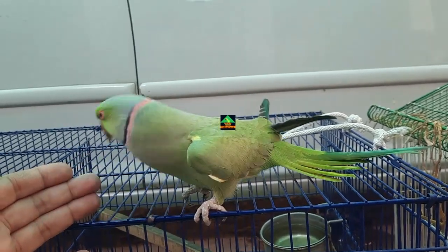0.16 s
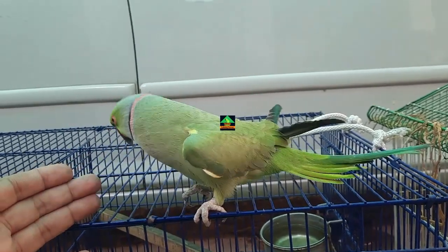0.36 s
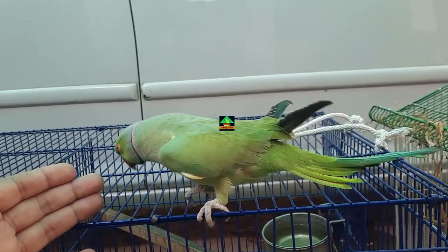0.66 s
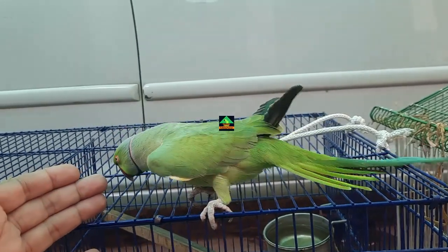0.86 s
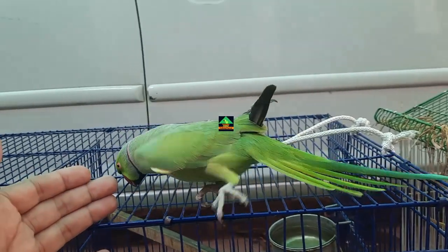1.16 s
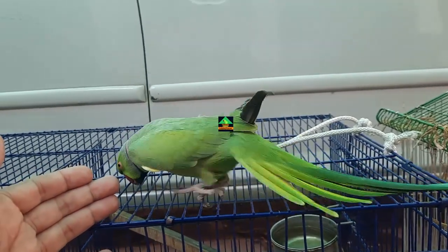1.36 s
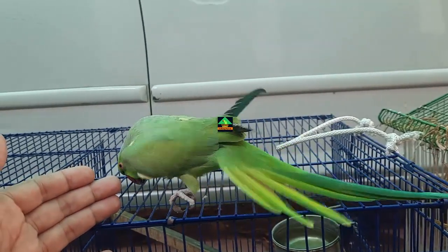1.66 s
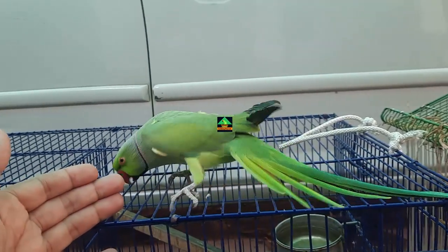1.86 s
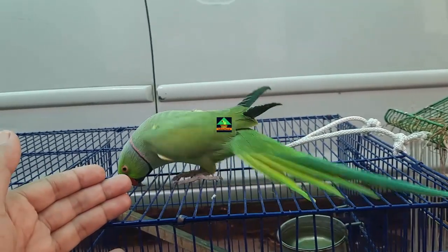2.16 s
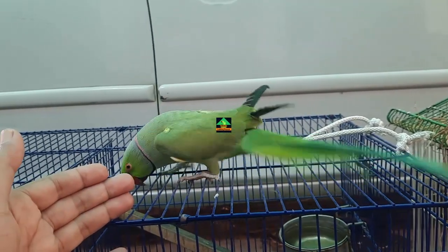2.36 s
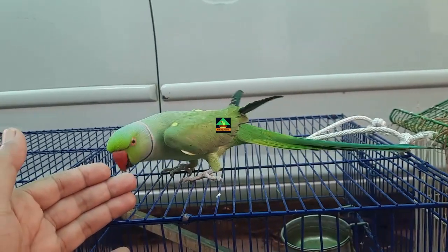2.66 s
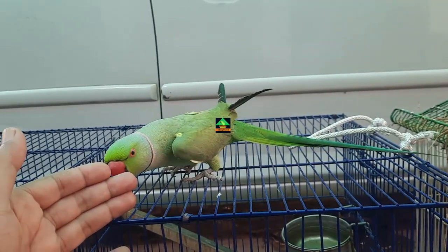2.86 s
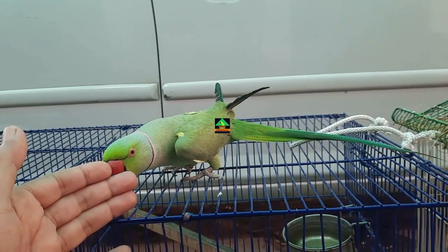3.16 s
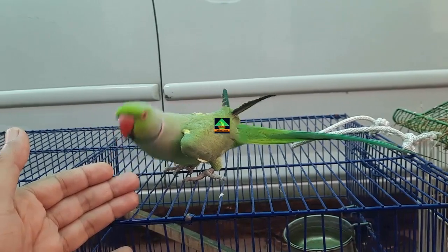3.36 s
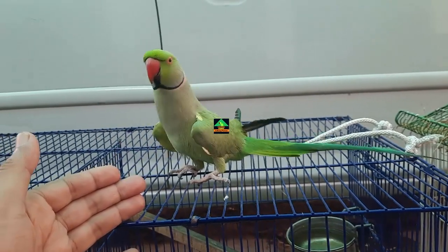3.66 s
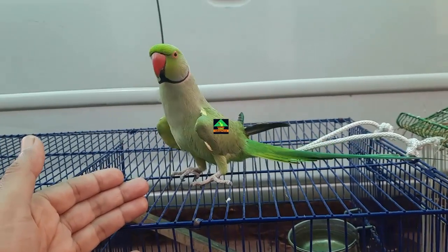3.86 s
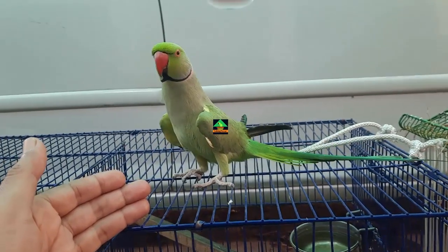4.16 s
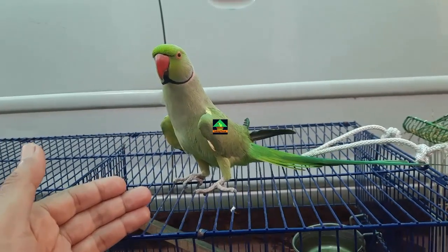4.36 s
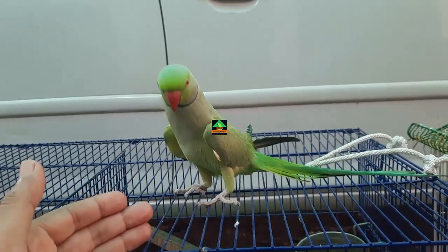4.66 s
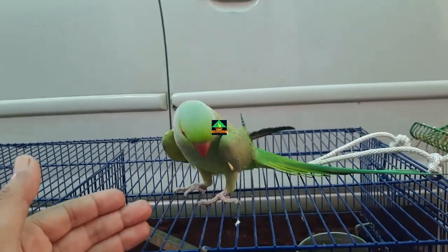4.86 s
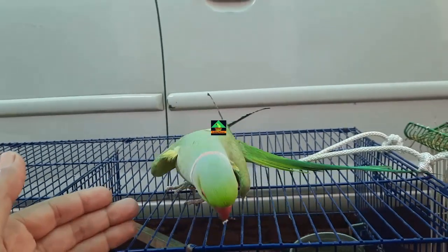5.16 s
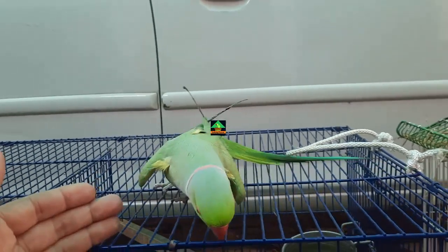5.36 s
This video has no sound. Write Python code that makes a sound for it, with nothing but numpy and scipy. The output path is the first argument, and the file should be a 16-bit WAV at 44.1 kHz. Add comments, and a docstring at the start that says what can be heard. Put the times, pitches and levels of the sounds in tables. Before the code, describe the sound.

Close stereo sound indoors: a bird's descending squawk comes first, followed by sparse metallic claw ticks and light feather brushing over low hum. A brief piercing whistle holds, then sags. More small ticks lead into six regularly spaced, arched parrot screeches, rough and bright, slightly weaker towards the end. The bird sits left of centre, with short reflections from the hard room.

```python
"""Parakeet on a wire cage

A parakeet close to two microphones in a bare room gives a falling squawk, a whistle and six arched screeches.
Its voice is a harmonic series with breath noise, filtered by throat resonances; air puffs precede calls.
Claws tick by exciting damped wire modes, and feathers rustle as short strokes of grainy noise.
Dense echoes and feedback delays form the space; noise bands and a narrow drone give hum and hiss."""
import sys
import numpy as np
from scipy import signal
from scipy.fft import rfft, irfft, next_fast_len
from scipy.io import wavfile

SR = 44100
rng = np.random.default_rng(int(sys.argv[2]) if len(sys.argv) > 2 else 0)


def unload_wav(signal):
    """Save mono or channel-first audio to the path in sys.argv[1] as 16-bit WAV at rate SR, clipped to [-1, 1]."""
    wavfile.write(
        sys.argv[1],
        SR,
        np.round(np.clip(np.atleast_2d(signal).T, -1, 1) * 32767).astype(np.int16),
    )


def voltage_ratio(decibels):
    """Convert decibels (scalar or array-like) to amplitude ratios, 20 dB per decade."""
    exponent = np.asarray(decibels, float) / 20
    return 10 ** exponent


N = 242550
TIME = np.arange(N) / SR

# falling squawk, already under way at the start: time_s, pitch_hz, level_db
SQUAWK_PATH = [(-0.02, 1670, -16.5), (0.033, 1752, -19.5), (0.043, 1427, -17.5), (0.09, 1398, -23.5),
               (0.22, 1284, -26), (0.25, 1134, -30.5), (0.345, 1036, -30), (0.41, 716, -40),
               (0.445, 674, -33.5)]
# whistle that holds, tips up and sags: time_s, pitch_hz, level_db
WHISTLE_PATH = [(1.862, 2120, -25.5), (1.88, 1966, -15), (1.95, 1927, -12.5), (1.98, 1980, -16.5),
                (2.005, 2040, -16), (2.022, 1947, -16), (2.05, 1722, -21.5), (2.09, 1522, -19),
                (2.125, 1436, -37)]
# roughness (0-1) at a held call's top pitch, and what is added as the pitch sags to nothing
CLEAR_ROUGH, SAG_ROUGH = .08, .55
# arched screeches: start_s, top_s, end_s, leap_pitch_hz, top_pitch_hz
SCREECH_ARCHES = [(3.436, 3.515, 3.58, 1820, 2543), (3.706, 3.779, 3.852, 1821, 2650),
                  (3.989, 4.049, 4.145, 1950, 2780), (4.285, 4.341, 4.43, 2176, 2696),
                  (4.568, 4.618, 4.724, 2363, 2732), (4.878, 4.926, 5.022, 2482, 2710)]
# opening croak, its share of the way to the top, then a leap
CROAK_HZ, CROAK_SHARE, LEAP_S = 1337.5, .13, .005
END_HZ = 1530
# screech descent: falling_time_share (0-1), pitch_drop_share (0-1)
PITCH_FALL = [(0.118, 0.107), (.38, .55), (.5, .64), (0.849, .83)]
# screech strength, before tiring, and roughness: pitch_hz, level_db, roughness (0-1)
SCREECH_VOICE = [(1410, -12.5, 0.41), (1430, -20.5, 0.41), (1746, -12, 0.22), (1950, -9, 0.28),
                 (2307, -13.5, 0.45), (2560, -15.5, .44), (2780, -21, 0.39)]
TIRING_DB_PER_S = -1.5   # later screeches are weaker
# membrane spectrum before the throat: pitch_multiple, relative_level_db
MEMBRANE_OVERTONES = [(.5, 1.5), (1, -10), (2, 4), (3, -7), (5, -8), (8, -21), (24, -48.5)]
# windpipe and beak resonances: centre_hz, width_hz (between points 6 dB down), gain_db
THROAT_RESONANCES = [(694, 580, 5.5), (1410, 900, -3.5), (2475, 1200, 1), (3724, 1540, 0), (4690, 220, 3),
                     (6855, 1780, -1.5), (11230, 2100, -8.5), (14100, 1600, -11.5)]
# half-pitch lines, further weighted by roughness squared: one gain_db each for squawk, whistle, screeches
HALF_PITCH_GAINS = [-38, -5.5, -10]
BEAK_HISS_DB = -4.5   # at full roughness, relative to the tone
# head direction for squawk, whistle, screeches: left_louder_db, left_earlier_ms,
# right_echo_db (relative to the direct sound), brightness_db_per_octave, octave_line_boost_db
HEAD_DIRECTIONS = [(3, -0.125, -47, -5, -4), (3, -0.41, -20, -0.5, -4), (7, 0.4356, -1, 1, 0)]
ECHO_MS = 0.3997
# short hiss as the beak opens before a call: start_s, relative_level_db
BEAK_PUFFS = [(1.848, -19), (3.4177, -24), (3.689, -18.5), (3.975, -19), (4.266, -21.5), (4.553, -24),
              (4.859, -27.5)]
# claws and beak on the wires: time_s, strength_db, left_louder_db (ringing only), low_modes_db
WIRE_TOUCHES = [(0.6849, -14, 3, -21.5), (1.1753, -15, 4, -20), (1.4352, -25, -16, -22.5),
                (2.7579, -31, 4, -28), (3.0588, -21, 27, -40), (3.064, -18, -10, -48),
                (3.068, -32, -12.5, -35), (3.159, -40.5, 7.5, 8.5), (3.174, -52, 22, 10),
                (4.487, -32, -15, -4), (5.147, -22, 17, -35), (5.163, -25.5, 28, -37.5),
                (5.177, -12.5, -0.5, -68)]
# resonant modes of the wires: frequency_hz, relative_level_db, t60_s
WIRE_MODES = [(1000, -2, .015), (1700, -4, .012), (3100, -7, .008), (3900, -9, .008), (6300, -3, .009),
              (7400, -2, .008), (11000, -6, .006), (13500, -7, .005)]
# feathers and feet brushing: start_s, length_s, noise_level_db, centre_hz
BRUSH_STROKES = [(0.312, 0.055, -51.5, 12030), (0.778, 0.1, -56.5, 12000), (1.022, 0.059, -48.5, 11000),
                 (1.082, 0.062, -54.5, 8000), (1.153, 0.08, -55.5, 8000), (1.414, 0.088, -52.5, 9120),
                 (1.563, 0.11, -58.5, 12000), (2.316, 0.096, -60.5, 9600), (2.417, 0.067, -60.5, 10820),
                 (2.987, 0.061, -53, 12100), (3.055, 0.027, -28.5, 7350), (3.364, 0.048, -57, 9000),
                 (4.462, 0.076, -46.5, 10040), (5.15, 0.028, -32, 6760), (5.40, 0.059, -60.5, 10030)]
ROOM_T60_S, ROOM_DB = 0.37, -23   # decay time without wall dulling; level of the feedback sound
WALL_CUT_HZ = 13000
# slow level curve of the background: time_s, gain_db
BACKGROUND_SWELL = [(0, 3), (.75, 0), (1.5, 3), (1.86, 1.5), (1.95, -0.5), (2.5, -4), (3.4, -0.5),
                    (3.6, -3), (5, -3.5), (5.5, -5.5)]
# hum spectrum: frequency_hz, relative_density_db_per_hz
HUM_SPECTRUM = [(12, -59), (20, -46), (31, -25.5), (65, -1.5), (101, -3), (129, 3.5), (176, -10),
                (206, -12.5), (241, -42), (286, -8), (307, -5), (414, -22.5), (600, -25.5), (780, -57),
                (1320, -120)]
# hiss spectrum: frequency_hz, relative_density_db_per_hz
HISS_SPECTRUM = [(260, -30), (450, -4), (794, -8.5), (1020, -9.5), (2330, -13), (5060, -25), (7690, -24.5),
                 (9200, -40.5), (13000, -20.5), (16000, -94.5)]
# stereo coherence of the background: frequency_hz, left_right_correlation (-1 to 1)
STEREO_LIKENESS = [(60, 0.97), (180, 0.89), (550, 0.29), (1650, -0.18), (4970, -0.037), (15000, 0.47)]
HUM_DB, HISS_DB, DRONE_DB = -35, -49.5, -47   # before the swell and the left-right balance
HISS_FOLLOWS, DRONE_FOLLOWS = 1, 3.8   # dB for each dB of the swell


def rms_one(x):
    """Normalisation: equal mean power makes levels comparable, here rms 1."""
    return x / np.sqrt(np.mean(x ** 2) + 1e-20)


def at_hz(points, hz):
    """Spectral interpolation: values run straight between points on a log-frequency axis."""
    points_hz, values = np.transpose(points)
    return np.interp(np.log(hz), np.log(np.maximum(points_hz, 1)), values)


def wobble(rate_hz, size):
    """Low-passed noise: four cascaded one-pole filters leave random wandering of spread 1."""
    noise = rng.standard_normal(size + 8000)   # the first 8000 samples let the filter settle
    r = np.exp(-2 * np.pi * rate_hz / SR)
    return rms_one(signal.sosfilt([[1 - r, 0, 0, 1, -r, 0]] * 4, noise)[8000:])


def band(x, low_hz, high_hz):
    """Band-pass filtering: only the range between two cut-off frequencies passes freely."""
    edges_hz = [low_hz, min(high_hz, .45 * SR)]
    return signal.sosfilt(signal.butter(2, edges_hz, "band", fs=SR, output="sos"), x)


def late(x, ms):
    """Propagation delay: the same wave arrives later (earlier if ms is negative)."""
    return np.interp(TIME - ms / 1000, TIME, x)


def bird():
    """Binaural cues: level and arrival differences, with a close echo at the right microphone."""
    out = np.zeros((2, N))
    sway_ms = 0.026 * wobble(27.2, N)   # the head never keeps still
    kinds = [[sagging(SQUAWK_PATH)], [sagging(WHISTLE_PATH)], [screech(*row) for row in SCREECH_ARCHES]]
    for calls, direction, half_db in zip(kinds, HEAD_DIRECTIONS, HALF_PITCH_GAINS):
        left_db, early_ms, echo_db, tilt_db, octave_db = direction
        voice = sum(call(rows, tilt_db, octave_db, half_db) for rows in calls)
        delay_ms = early_ms + sway_ms
        echo = voltage_ratio(echo_db) * late(voice, delay_ms + ECHO_MS)
        out[0] += voice
        out[1] += voltage_ratio(-left_db) * (late(voice, delay_ms) + echo)
    return out


def sagging(rows):
    """Pitch-dependent roughness: a held call grows rougher as its pitch sags."""
    s, pitch_hz, level_db = np.transpose(rows)
    rough = CLEAR_ROUGH + SAG_ROUGH * (1 - pitch_hz / pitch_hz.max())
    return np.transpose([s, pitch_hz, level_db, rough])


def screech(start_s, top_s, end_s, leap_hz, top_hz):
    """Frequency modulation: croak, leap, rounded climb and fall also set strength and roughness."""
    s = np.arange(start_s, end_s, .002)
    croak_s = start_s + CROAK_SHARE * (top_s - start_s)
    leap = np.clip((s - croak_s) / LEAP_S, 0, 1)
    climb = np.clip((s - croak_s - LEAP_S) / (top_s - croak_s - LEAP_S), 0, 1)
    fall_points = [(0.017, 0.0008), *PITCH_FALL, (0.98, 1)]
    drop = np.interp((s - top_s) / (end_s - top_s), *np.transpose(fall_points))
    hz = CROAK_HZ + (leap_hz - CROAK_HZ) * leap
    hz = hz + (top_hz - leap_hz) * np.sin(np.pi / 2 * climb) - (top_hz - END_HZ) * drop
    voice_hz, voice_db, voice_rough = np.transpose(SCREECH_VOICE)
    tiring_db = TIRING_DB_PER_S * (start_s - SCREECH_ARCHES[0][0])
    level_db = np.interp(hz, voice_hz, voice_db) + tiring_db
    return np.transpose([s, hz, level_db, np.interp(hz, voice_hz, voice_rough)])


def call(rows, tilt_db, octave_db, half_db):
    """Source-filter voice: a rough membrane tone joins breath and beak noise under one envelope."""
    s, pitch_hz, level_db, rough = np.transpose(rows)
    rise_s, fall_s = .0015, .006
    at = slice(max(int((s[0] - 3 * rise_s) * SR), 0), int((s[-1] + 6 * fall_s) * SR))
    t = TIME[at]
    hz = np.interp(t, s, pitch_hz)
    rough = np.clip(np.interp(t, s, rough), 0, 1)
    shake = (.004 + .04 * rough) * wobble(420, len(t))
    phase = 2 * np.pi * np.cumsum(hz * (1 + shake)) / SR
    # a call opens with a weaker croak whose overtones are nearly even
    settled = np.clip(.35 + (t - s[0] - .006) / .012, .35, 1)
    tone = membrane(hz, phase, rough, settled, tilt_db, octave_db, half_db)
    share = rough ** 3 * voltage_ratio(11)   # breath relative to the tone
    hiss = voltage_ratio(BEAK_HISS_DB) * rough * rms_one(band(rng.standard_normal(len(t)), 4800, 15000))
    mix = (tone + share * breath(phase, tilt_db) + hiss) / np.sqrt(1 + share ** 2)
    edges = np.exp(np.minimum(t - s[0], 0) / rise_s + np.minimum(s[-1] - t, 0) / fall_s)
    out = np.zeros(N)
    out[at] = mix * voltage_ratio(np.interp(t, s, level_db)) * edges * settled
    return out


def membrane(hz, phase, rough, settled, tilt_db, octave_db, half_db):
    """Harmonic series: overtones and half-pitch lines, each modulated alone, excite the throat."""
    tone, power = 0, 0
    for k in np.arange(.5, 24, .5):
        line_db = settled * at_hz(MEMBRANE_OVERTONES, k) if k >= 1 else settled * MEMBRANE_OVERTONES[0][1]
        if k >= 1:
            line_db = settled * at_hz(MEMBRANE_OVERTONES, k)
        source = voltage_ratio(line_db + tilt_db * np.log2(k) + octave_db * (k == 2))
        if k % 1:
            source = source * rough ** 2 * voltage_ratio(half_db)
        gain = source * throat(k * hz) * (k * hz < .4 * SR)
        # each line swells and breaks up by itself, the high ones most and fastest
        depth = (.04 + .9 * rough) * k ** .85
        beat = 1 + depth * wobble(min(200 + 110 * k, 1100), len(hz))
        tone = tone + gain * beat * np.sin(k * phase)
        power = power + gain ** 2 * (1 + depth ** 2) / 2
    return tone / np.sqrt(power)


def breath(phase, tilt_db):
    """Turbulence noise: throat-filtered air pulses with each cycle, above a lumpy low rasp."""
    size = len(phase)
    air = rng.standard_normal(size) * (1 + 0.23 * np.sin(phase))
    bins_hz = np.fft.rfftfreq(size, 1 / SR) + 1
    colour = throat(bins_hz) ** 1.16 * voltage_ratio(tilt_db * np.log2(bins_hz))
    air = rms_one(irfft(rfft(air) * colour, size))
    rasp = rms_one(band(rng.standard_normal(size), 400, 1980))
    return air + voltage_ratio(-14 + 7.5 * wobble(60.9, size)) * rasp


def throat(hz):
    """Resonance: the powers of the windpipe and beak formants add to give the gain."""
    power = sum(voltage_ratio(db) ** 2 / (1 + (2 * (hz - top) / width) ** 2) ** 2
                for top, width, db in THROAT_RESONANCES)
    return np.sqrt(power)


def puffs():
    """Transient turbulence: band-passed noise starts sharply and dies away along a Gaussian."""
    length_s, shape = .007, 0
    for s, db in BEAK_PUFFS:
        x = np.maximum(TIME - s, 0) / length_s
        shape = shape + voltage_ratio(db) * np.minimum(x * 6, 1) * np.exp(-x ** 2)
    air = shape * rms_one(band(rng.standard_normal(N), 1800, 11000)) / np.pi
    return np.array([air, voltage_ratio(-2) * late(air, 0.21)])


def ticks():
    """Modal impact: each touch cracks and sets damped wire modes ringing at random strengths."""
    s, peak_db, left_db, low_db = np.transpose(WIRE_TOUCHES)
    chance_db = rng.normal(0, 2.5, (len(s), len(WIRE_MODES)))
    out = np.zeros((2, N))
    for (hz, db, t60_s), own_db in zip(WIRE_MODES, chance_db.T):
        clicks = np.full((2, N), 1e-18)
        strength_db = peak_db + db + own_db + (low_db if hz < 2000 else -10)
        clicks[:, (s * SR).astype(int)] = voltage_ratio(strength_db + np.outer([.5, -.5], left_db))
        r, w = voltage_ratio(-60 / (t60_s * SR)), 2 * np.pi * hz / SR   # decay and phase step per sample
        out += signal.lfilter([0, np.sin(w)], [1, -2 * r * np.cos(w), r * r], clicks)
    hard_db = peak_db - np.maximum(low_db + 2.5, 0) / 2   # dull, low touches crack less
    crack, crack_s = 0, 0.0011
    for at, db in zip(s, hard_db):
        decay = np.exp(-np.maximum(TIME - at, 0) / crack_s) * (TIME >= at)
        crack = crack + voltage_ratio(db - 6) * decay
    return out + crack * band(rng.standard_normal((2, N)), 2850, 12000)


def rustles():
    """Friction noise: random grains form short band-limited strokes that start fast and fade."""
    out, octaves = np.zeros((2, N)), 0.76   # half-width of each band
    for s, length_s, db, hz in BRUSH_STROKES:
        at = slice(int(s * SR), int((s + 2 * length_s) * SR))
        x = (TIME[at] - s) / length_s
        grains = rng.standard_normal((2, len(x))) * voltage_ratio(4 * wobble(160, len(x)))
        brush = rms_one(band(grains, hz * 2 ** -octaves, hz * 2 ** octaves))
        out[:, at] += voltage_ratio(db) * np.minimum(8 * x, 1) * np.exp(-x ** 4) * brush
    return out * voltage_ratio([[1.5], [-1.5]])


def scatter(x):
    """Scattering: wires, hand and wall return dense bright echoes, different at each microphone."""
    t = TIME[:SR // 25]
    echoes = band(rng.standard_normal((2, len(t))), 2500, 8500) * np.exp(-t / 0.012) * (t > .001)
    echoes = echoes / np.sqrt(np.sum(echoes ** 2, axis=1, keepdims=True))
    return voltage_ratio(-11) * signal.fftconvolve(x, echoes, axes=1)[:, :N]


def room(x):
    """Reverberation: ten feedback delays a side lose level and treble on every round."""
    size = next_fast_len(N + SR)
    z = np.exp(-2j * np.pi * np.fft.rfftfreq(size))   # delay of one sample
    dull = np.exp(-2 * np.pi * WALL_CUT_HZ / SR)
    out = [0, 0]
    for k, lag in enumerate((rng.uniform(.008, .03, 20) * SR).astype(int)):
        loss = voltage_ratio(-60 * lag / SR / ROOM_T60_S)
        loop = loss * np.exp(lag * np.log(z)) * (1 - dull) / (1 - dull * z)
        out[k % 2] = out[k % 2] + loop / (1 - loop) * (-1) ** (k // 2)
    return irfft(rfft(x, size) * np.array(out), size)[:, :N]


def steady(spectrum, edges_hz, patchy_db):
    """Partial coherence: shared and opposed noise make flickering stereo bands, at overall rms 1."""
    out, white = 0, rng.standard_normal((2, 2, N + 8000))
    for k, (low, high) in enumerate(zip(edges_hz, edges_hz[1:])):
        mid, side = band(white[k % 2], low, high)[:, 8000:]
        centre_hz = np.sqrt(low * high)
        alike = np.clip(at_hz(STEREO_LIKENESS, centre_hz), -1, 1)
        gain = voltage_ratio(at_hz(spectrum, centre_hz) + patchy_db * wobble(13.3, N))
        out = out + gain * (np.sqrt(1 + alike) * mid + np.sqrt(1 - alike) * side * [[1], [-1]])
    return rms_one(out)


def background():
    """Superposition: low hum, hiss and a narrow drone near 170 Hz follow one level curve."""
    swell_db = np.interp(TIME, *np.transpose(BACKGROUND_SWELL))
    hum = voltage_ratio(HUM_DB + swell_db) * steady(HUM_SPECTRUM, np.geomspace(20, 600, 22), patchy_db=2.5)
    hiss = steady(HISS_SPECTRUM, np.geomspace(500, 17000, 11), patchy_db=.4)
    hiss = voltage_ratio(HISS_DB + HISS_FOLLOWS * swell_db) * hiss
    drone = rms_one(band(rng.standard_normal(N), 165.3, 174.9))
    drone = voltage_ratio(DRONE_DB + DRONE_FOLLOWS * swell_db) * drone
    return (hum + hiss + drone) * voltage_ratio([[1.4], [-1.6]])


def scene():
    """Linear superposition: direct sound, scattering, reverberation and background add."""
    voice = bird() + puffs()
    cage = ticks() + rustles()
    direct = voice + cage
    reverb = voltage_ratio(ROOM_DB) * room(voice[0] + cage[0] / 2)
    return direct + scatter(direct) + reverb + background()


def band_limit(x):
    """A steep low-pass at the top of the band."""
    return signal.sosfilt(signal.butter(12, 17000, fs=SR, output="sos"), x)


def record(dry):
    """Nonlinear distortion: uneven microphone bending adds a low rasp, and saturation rounds peaks."""
    bent = dry + 0.23 * band(dry ** 2, 15, 3000)
    ceiling = 1.05
    mix = ceiling * np.tanh(bent / ceiling)
    return band_limit(mix)


dry = scene()
out = record(dry)
unload_wav(out)
```